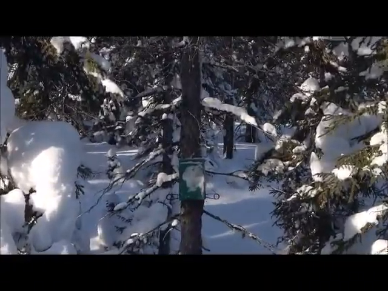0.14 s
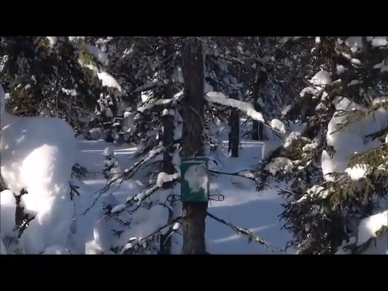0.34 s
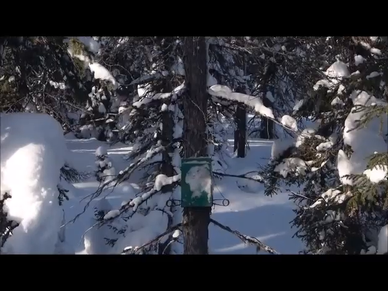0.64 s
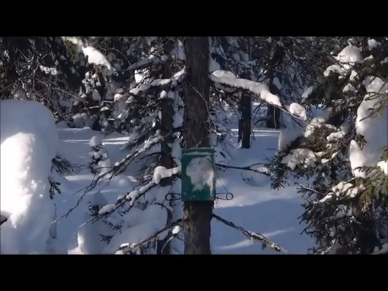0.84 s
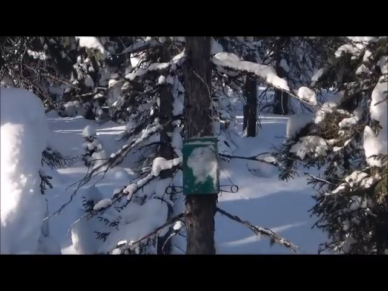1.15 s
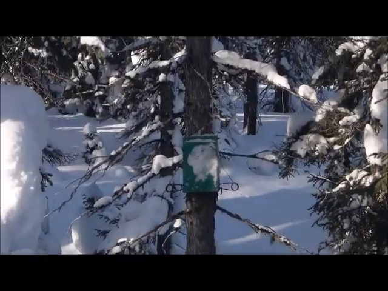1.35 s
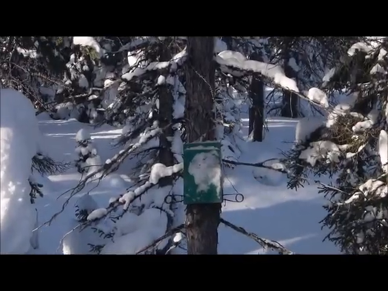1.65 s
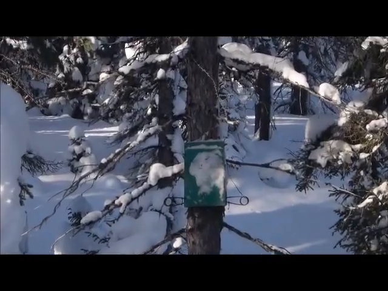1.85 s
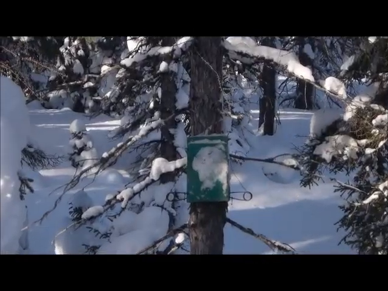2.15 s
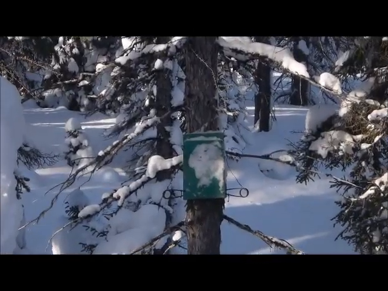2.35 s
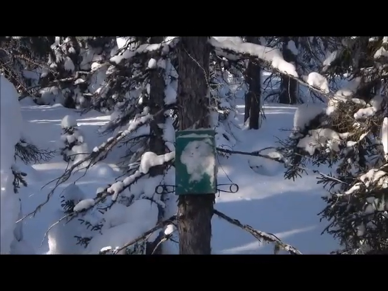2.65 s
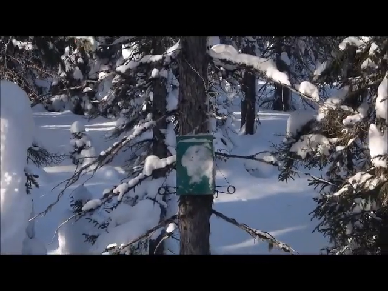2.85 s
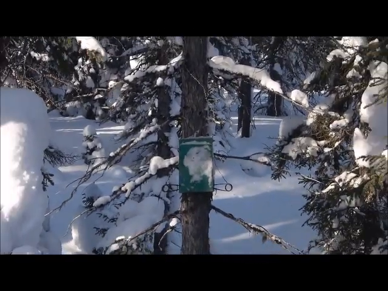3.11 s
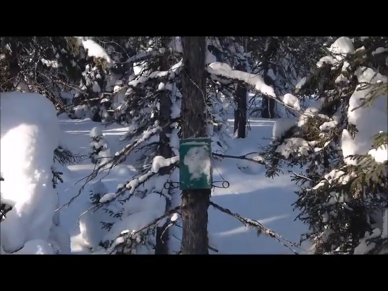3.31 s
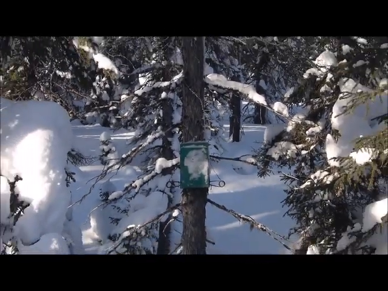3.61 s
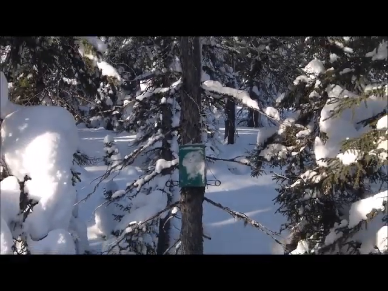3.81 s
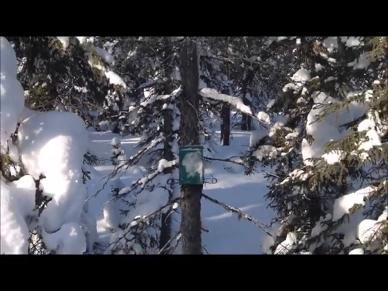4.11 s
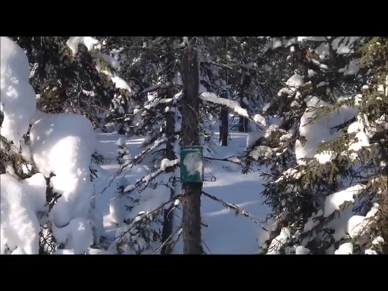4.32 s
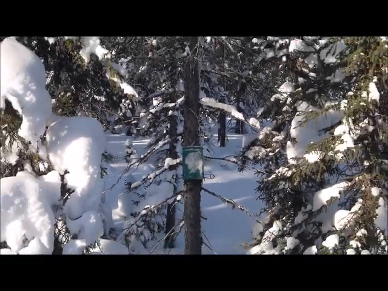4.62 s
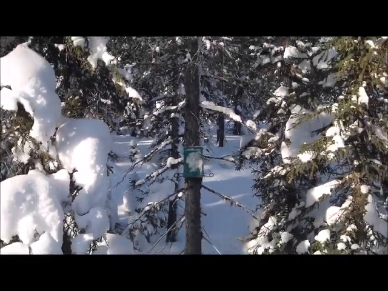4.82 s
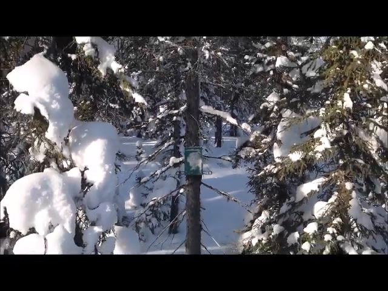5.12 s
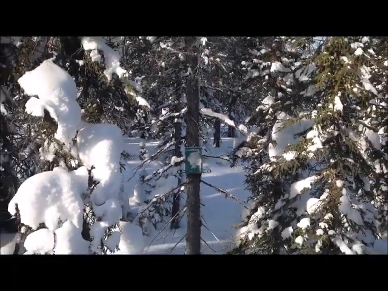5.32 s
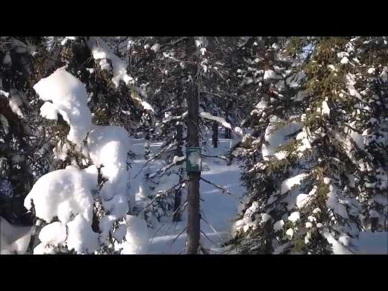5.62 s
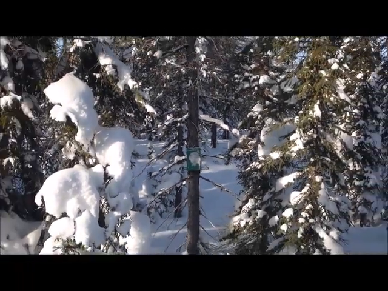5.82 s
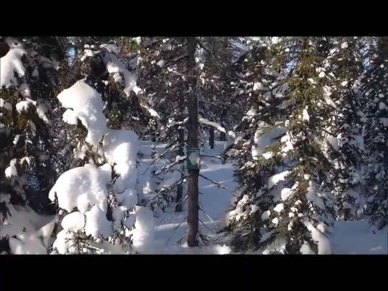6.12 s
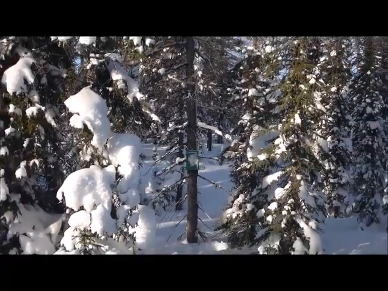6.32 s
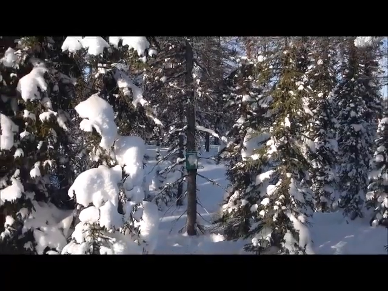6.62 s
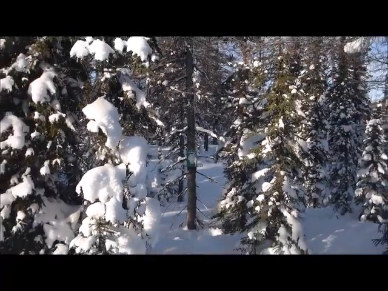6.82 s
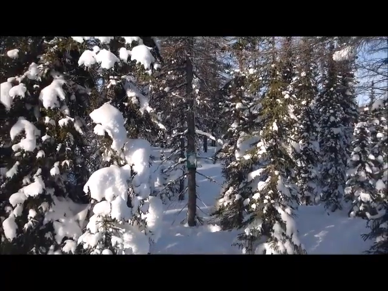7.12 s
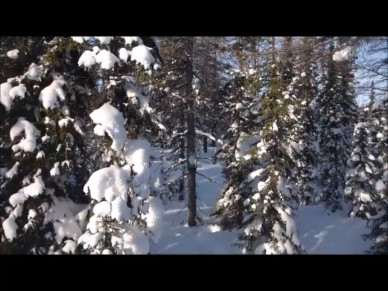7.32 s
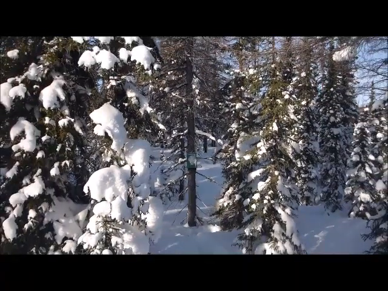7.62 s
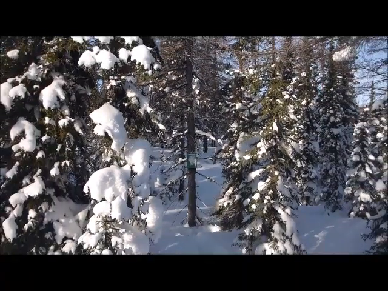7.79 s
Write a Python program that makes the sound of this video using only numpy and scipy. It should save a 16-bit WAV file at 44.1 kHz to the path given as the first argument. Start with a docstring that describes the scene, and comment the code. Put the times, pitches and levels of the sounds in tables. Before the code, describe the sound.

Close outdoor stereo capture of an idling snowmobile: fast, bassy chugging at constant speed with a slight lopsided limp, a droning low hum underneath and gas hiss puffing along. A soft whistle flutters left of centre. A loose panel buzzes briefly twice early on, fingers tick against the camera, and gloves creak faintly. Nothing speeds up or slows down noticeably before the sudden end just after seven seconds.

```python
"""Heavy thumps at about 750 a minute: a snowmobile's two-stroke engine idles near a hand-held camera.
Every turn, a pressure step rings the silencer; a second follows when the charge lights, mostly on alternate turns.
A low hum and rumble lie under them; noise gated by the gas flow hisses and knocks, leaning left.
A wavering tone whistles left of centre; noise taps and grains make ticks and glove creaks on the camera.
The sound is cut off before the end."""
import sys
import numpy as np
from scipy import signal
from scipy.io import wavfile
from scipy.ndimage import uniform_filter1d

SR = 44100
rng = np.random.default_rng(int(sys.argv[2]) if len(sys.argv) > 2 else 0)


def generate_wav(signal):
    """Clip the signal to [-1, 1] and save it as 16-bit WAV at the path in sys.argv[1]."""
    frames = np.transpose(np.atleast_2d(signal))
    scaled = np.clip(frames, -1, 1) * 32767
    pcm = np.round(scaled).astype(np.int16)
    wavfile.write(sys.argv[1], SR, pcm)


N = 350595

HOT_RETURN, COLD_RETURN = .36, .2  # pipe return gain, with and without burnt charge


def silencer():
    """Port steps with a small leak 3 ms ahead; burnt charge adds a slower step."""
    port_s, _, first_db, gap_s, second_db = turns()
    times_s = np.r_[port_s, port_s - .003]
    sizes = undb(np.r_[first_db + 62, first_db + 46])
    cold = thump(times_s, sizes, 0.69, COLD_RETURN)
    hot = thump(port_s + gap_s, undb(second_db + 61), 1.25, HOT_RETURN)
    return cold + hot


# two silencer chambers in series: [centre_hz, width_hz]
CHAMBER_MODES = [(87, 31), (130, 19)]
# silencer shell modes: [centre_hz, width_hz, gain_db]
SHELL_MODES = [(61.2, 8.3, -29), (175, 21, -33), (248.9, 4.5, -24.5), (296, 22, -30.5), (347.7, 20, -41)]
PIPE_MS = 18.7  # round trip


def thump(times_s, sizes, rise_ms, return_gain):
    """Pressure steps ring both chambers and the shell, and a share comes back down the pipe."""
    push = np.diff(puffs(times_s, sizes, rise_ms), prepend=0)
    push = uniform_filter1d(push, size=55)
    out = ring(ring(push, *CHAMBER_MODES[0]), *CHAMBER_MODES[1])
    out = out - sum(undb(db) * ring(push, hz, width_hz) for hz, width_hz, db in SHELL_MODES)
    lag = int(PIPE_MS * SR / 1000)
    echo = out
    for _ in range(3):
        echo = return_gain * np.r_[np.zeros(lag), echo[:-lag]]
        out = out + echo
    return out


# port openings of lit turns, every second turn: [start_s]
FIRING_TIMES = [-0.077, 0.0785, 0.2433, 0.4102, 0.5685, 0.717, 0.868, 1.0223, 1.1836, 1.3418, 1.4983,
                1.6613, 1.8253, 1.9949, 2.1585, 2.3162, 2.4694, 2.6239, 2.7811, 2.9435, 3.104, 3.2628,
                3.4183, 3.5767, 3.7319, 3.8951, 4.0554, 4.2181, 4.3725, 4.5368, 4.699, 4.8606, 5.0225,
                5.1789, 5.3355, 5.4962, 5.6538, 5.8085, 5.9675, 6.1268, 6.2906, 6.4472, 6.6172, 6.7754,
                6.9231, 7.0777, 7.2336]
# turns in between that light partly: [start_s, second_thump_db]
PARTIAL_FIRINGS = [(1.263, -6), (1.908, -13), (2.076, -13.5), (2.235, -7), (3.498, -5.5), (4.295, -2.5),
                   (4.452, -14), (4.781, -4.5), (5.099, -3), (5.255, -5.5), (5.729, -4.5), (5.886, -6.5),
                   (6.046, -3.5), (6.529, -10.5), (6.696, -10.5), (6.848, -17), (7.156, -1.5)]
TURN_MS = 79  # usual length
LIT_SHARE, RELIGHT_SHARE = .491, .008  # lit turn's part of the pair; extra when the next lights too
BURN_SHARE = .1148  # port to second thump, part of the pair
LIT_THUMP_DB, LIT_BURN_DB, UNLIT_BURN_DB = .5, -.65, -25
UNLIT_THUMP_DB, THUMP_DB_PER_MS = 0, .2  # weaker after a quick turn


def turns():
    """Crank turns: port_s, length_s, first_db, gap_s to second thump, second_db."""
    lit_s = np.ravel(FIRING_TIMES)
    pair_s = np.diff(lit_s, append=lit_s[-1] + 2 * TURN_MS / 1000)
    again_db = np.full(len(lit_s), 1. * UNLIT_BURN_DB)
    relight_s, relight_db = np.transpose(PARTIAL_FIRINGS)
    again_db[np.searchsorted(lit_s, relight_s) - 1] = relight_db
    quick_s = pair_s * (LIT_SHARE + RELIGHT_SHARE * undb(again_db))
    gap_s = BURN_SHARE * pair_s
    same = np.ones(len(lit_s))
    between_db = UNLIT_THUMP_DB + THUMP_DB_PER_MS * (1000 * quick_s - TURN_MS)
    fired = [lit_s, quick_s, LIT_THUMP_DB * same, gap_s, LIT_BURN_DB * same]
    between = [lit_s + quick_s, pair_s - quick_s, between_db, gap_s, again_db]
    return np.stack([fired, between], axis=2).reshape(len(fired), -1)[:, 1:-1]


def puffs(times_s, sizes, rise_ms):
    """Pressure u exp(-u), peaking after rise_ms, at each time."""
    x = np.zeros(N)
    index = np.clip((np.asarray(times_s) * SR).astype(int), 0, N - 1)
    np.add.at(x, index, sizes)
    pole = np.exp(-1000 / (rise_ms * SR))
    return signal.lfilter([0, (1 - pole) * pole], [1, -2 * pole, pole ** 2], x)


def port_flow():
    """Gas flow: a burst around each port opening and another around the second thump."""
    port_s, _, _, _, second_db = turns()
    scatter = undb(2 * rng.standard_normal((len(port_s), 2)))
    first = puffs(port_s - .007, scatter[:, 0], 4.34) / 5
    second_sizes = (1 + undb(second_db)) * 0.24 * scatter[:, 1]
    flow = first + puffs(port_s + 0.011, second_sizes, 6.9) / 6.9
    return flow / np.percentile(flow, 97)


# relative hiss spectrum: [centre_hz, density_db_per_hz]
GAS_SPECTRUM = [(120, -30), (200, -1.5), (263, -5), (400, -12), (586, -17), (702, -33), (940, -26),
                (1680, -33), (4420, -48), (6720, -51.5), (8990, -68.5), (11400, -52), (15500, -78)]
# slow change of hiss and casing: [time_s, change_db]
GAS_SWELL = [(0, 1), (.6, 0), (1.2, -0.5), (2, -0.5), (2.7, 0), (3.2, 1), (4, 2), (5, 2), (6, 1.5),
             (7.3, 2)]
# hiss width, before a 0.5 dB cut: [centre_hz, side_minus_mid_db]
GAS_SIDE = [(200, -30), (420, -28), (700, -11), (1300, -7), (2400, -6), (4400, -3), (8000, -3), (15000, -1)]
# hiss balance: [centre_hz, left_minus_right_db]
GAS_LEFT = [(200, 0), (420, 0), (700, 3), (1300, 1), (2400, 2), (4400, 3), (15000, 1.5)]
GAS_DB = -33.5


def gas(flow):
    """Turbulence as third-octave noise bands gated by the flow; wider in the treble."""
    out, swell_db = 0, curve(GAS_SWELL)
    for hz in 200 * 2 ** np.arange(0, 6.4, 1 / 3):
        mid, side = (band(rng.standard_normal(N), hz, hz / 3) for _ in range(2))
        gate = 1 + 0.93 * min(hz / 700, 1) * flow
        side = undb(over(GAS_SIDE, hz) - 0.5) * side
        both = pan(mid, over(GAS_LEFT, hz)) + opposed(side)
        band_db = over(GAS_SPECTRUM, hz) + 1.5 * walk(13) + min(hz / 1500, 1) * swell_db
        out = out + undb(band_db) * gate * both
    return level(out, GAS_DB)


# engine casing modes: [centre_hz, width_hz, level_db]
CASING_MODES = [(1464, 170, -60.5), (1646, 260, -62), (2060, 190, -68), (4920, 170, -76), (6870, 810, -78),
                (11090, 600, -83.5)]
# loose panel buzzes: [start_s, end_s, level_db]
PANEL_BUZZES = [(1.32, 1.54, -46.5), (2.15, 2.62, -45)]
# panel modes, relative: [centre_hz, width_hz, level_db]
PANEL_MODES = [(540, 200, 0), (720, 160, 1), (1130, 200, -1), (1700, 450, -3), (2300, 600, -10)]


def knocks(flow):
    """Flow-gated noise shakes the casing modes every turn, and a loose panel now and then."""
    shake = flow * rng.standard_normal(N)
    casing = modes(shake, CASING_MODES)
    shake = (0.64 + flow) * rng.standard_normal(N)
    panel = level(modes(shake, PANEL_MODES), 0)
    loose = sum(undb(db) * span(start_s, end_s, .015) for start_s, end_s, db in PANEL_BUZZES)
    return pan(casing * undb(curve(GAS_SWELL)), 3) + pan(panel * loose, 0.7)


WHISTLE_HZ, WHISTLE_HZ_PER_DB, WHISTLE_MID_DB = 942, 1.5, -45  # pitch at mid level, slope
WHISTLE_LEFT_DB, FLUTTER_DB = 4.6, 2.5


def whistle():
    """Narrow tone on the gas flow, rising in pitch as it swells, with a noise-band edge."""
    db = blowing() + FLUTTER_DB * walk(30)
    pitch_hz = WHISTLE_HZ + WHISTLE_HZ_PER_DB * (db - WHISTLE_MID_DB) + 12 * walk(45)
    tone = np.sqrt(2) * np.sin(2 * np.pi * np.cumsum(pitch_hz) / SR) * undb(2 * walk(50))
    edge = level(band(rng.standard_normal(N), WHISTLE_HZ, 60), -3.5)
    return pan((tone + edge) * undb(db), WHISTLE_LEFT_DB)


# slow whistle strength, before turn-by-turn changes: [time_s, level_db]
WHISTLE_STRENGTH = [(0, -47), (.35, -46), (.45, -44), (.7, -48.5), (1.05, -42.5), (1.45, -42), (1.6, -45.5),
                    (2.05, -45.5), (2.4, -41), (2.85, -45.5), (3.3, -42.5), (6.4, -42.5), (6.55, -48.5),
                    (6.65, -40.5), (7.3, -42)]
WHISTLE_DB_PER_MS = -.75  # weaker while the engine turns slowly
SAG_LIT_DB, SAG_UNLIT_DB = -6, -12  # late in a turn


def blowing():
    """Whistle dB: up at the port, sagging late in the turn, most when unlit; weaker when slow."""
    _, _, _, gap_s, second_db = turns()
    sag_db = SAG_UNLIT_DB + (SAG_LIT_DB - SAG_UNLIT_DB) * undb(second_db)
    mean_turn_ms = 1000 * gap_s / BURN_SHARE / 2  # over the pair
    speed_db = WHISTLE_DB_PER_MS * (mean_turn_ms - TURN_MS)
    return curve(WHISTLE_STRENGTH) + turn_curve(np.c_[speed_db, speed_db, speed_db + sag_db])


SAG_FROM, SAG_DEEPEST = .4, .78  # parts of the turn


def turn_curve(values):
    """Interpolate three values a turn: port opening, sag start, deepest sag."""
    port_s, length_s, _, _, _ = turns()
    knots_s = np.c_[port_s, port_s + SAG_FROM * length_s, port_s + SAG_DEEPEST * length_s]
    return curve(np.c_[knots_s.ravel(), values.ravel()])


HUM_HZ, HUM_DB = 251, -32.5
HUM_LATE_DB = 4  # swell late in an unlit turn, before levelling
RUMBLE_DB = -32


def hum():
    """Wavering low tone, swelling late in unlit turns, over chassis rumble from low noise bands."""
    pitch_hz = HUM_HZ + 3 * walk(11)
    tone = np.sin(2 * np.pi * np.cumsum(pitch_hz) / SR) * undb(1.8 * walk(8) + HUM_LATE_DB * late())
    rumble = band(rng.standard_normal(N), 120, 110)
    apart = band(rng.standard_normal(N), 110, 90)  # opposed left and right
    return level(tone, HUM_DB) + level(rumble, RUMBLE_DB) + opposed(level(apart, -48.5))


def late():
    """0 at the port, rising late in the turn to how far the charge stayed unlit (0-1)."""
    second_db = turns()[4]
    return turn_curve(np.outer(1 - undb(second_db), [0, 0, 1]))


# camera taps, mode levels against the third mode:
# [start_s, level_db, left_minus_right_db, mode1_db, mode2_db, mode4_db]
CAMERA_TICKS = [(1.3056, -50, 5.5, 2, 10, -22), (1.399, -48.5, 8.5, -4, 7.5, -26),
                (1.4311, -21.5, -4.5, -5.5, -5, -23.5), (2.3997, -41.5, 5.5, 2, -12, -24),
                (2.463, -31.5, 3, 6, -11.5, -22.5), (2.49, -40.5, 0.5, -2, -4, -13.5),
                (4.3185, -43, -8, -13, -22, 3), (4.3214, -30.5, 4, 2, -2, -2.5)]
# camera body modes: [centre_hz, width_hz]
BODY_MODES = [(3600, 860), (5000, 1160), (6800, 630), (12500, 2200)]


def ticks():
    """Short decaying noise taps ring the modes of the camera body."""
    out = np.zeros((2, N))
    for start_s, db, left_db, low_db, mid_db, top_db in CAMERA_TICKS:
        tap = rng.standard_normal(1300) * np.exp(-np.arange(1300) / 18)
        rings = [band(tap, hz, width_hz) for hz, width_hz in BODY_MODES]
        gains_db = (low_db, mid_db, 0, top_db)
        sound = sum(undb(g) * r / np.abs(r).max() for g, r in zip(gains_db, rings))
        i = int(start_s * SR)
        out[:, i:i + 1300] += pan(undb(db - 3.0) * sound, left_db)
    return out


# gloves on the camera: [start_s, end_s, start_level_db, centre_hz, width_hz]
GLOVE_CREAKS = [(0.95, 1.014, -54, 6340, 2500), (1.365, 1.486, -57, 6600, 1200),
                (1.488, 1.537, -57.5, 6740, 1200), (2.275, 2.354, -58.5, 6560, 1536),
                (2.456, 2.562, -65.5, 6860, 1000), (6.319, 6.387, -54, 3460, 2520),
                (6.32, 6.388, -51, 6500, 2510), (6.318, 6.41, -59, 11200, 2210)]


def creaks():
    """Cloth slipping on the camera: dense uneven noise grains in a band, falling 9 dB."""
    out = np.zeros((2, N))
    for start_s, end_s, db, hz, width_hz in GLOVE_CREAKS:
        grains = rng.standard_normal((2, N)) * undb(2 * walk(60))
        pair = grains[0] + opposed(0.43 * grains[1])
        gain = span(start_s, end_s, 0.0072) * undb(-9 * fade(start_s, end_s))
        out += gain * level(band(pair, hz, width_hz), db)
    return out


def undb(db):
    """dB to amplitude ratio."""
    return 10 ** (np.asarray(db) / 20)


def level(x, db):
    """Scale to an RMS level in dB."""
    return x * undb(db) / np.sqrt(np.mean(x ** 2))


def ring(x, hz, width_hz):
    """Resonance with gain 1 at the centre."""
    return signal.lfilter(*signal.iirpeak(hz, hz / width_hz, fs=SR), x)


def band(x, hz, width_hz):
    """The same resonance twice, for steeper sides."""
    return ring(ring(x, hz, width_hz), hz, width_hz)


def modes(x, table):
    """Sum of bands, each set to its own RMS level."""
    return sum(level(band(x, hz, width_hz), db) for hz, width_hz, db in table)


def curve(table):
    """Interpolate a table over time."""
    time_s, value = np.transpose(table)
    return np.interp(np.arange(N) / SR, time_s, value)


def over(table, hz):
    """Interpolate a table over log frequency."""
    table_hz, value = np.transpose(table)
    return np.interp(np.log(hz), np.log(table_hz), value)


def pan(x, left_db):
    """Stereo pair with a left minus right level difference."""
    return x * undb(np.array([[left_db / 2], [-left_db / 2]]))


def opposed(x):
    """Stereo pair of opposite polarity."""
    return x * np.array([[1], [-1]])


def walk(rate_hz):
    """Random levels held 1 / rate_hz and slewed twice; spread near 1."""
    k = int(SR / rate_hz)
    held = np.repeat(rng.standard_normal(N // k + 1), k)
    return 1.302 * uniform_filter1d(uniform_filter1d(held, k), k)[:N]


def fade(start_s, end_s):
    """Linear ramp 0 to 1."""
    return np.clip((np.arange(N) / SR - start_s) / (end_s - start_s), 0, 1)


def span(start_s, end_s, edge_s):
    """Gate with linear edges."""
    t = np.arange(N) / SR
    return np.clip(np.minimum(t - start_s, end_s - t) / edge_s, 0, 1)


def scene():
    """Engine layers share one gas flow; camera handling is added."""
    flow = port_flow()
    return silencer() + hum() + gas(flow) + knocks(flow) + whistle() + ticks() + creaks()


# microphone dips: [centre_hz, width_hz, share_removed]
MIC_DIPS = [(2850, 69, 0.33), (9030, 1800, 1)]
END_S, TOP_HZ = 7.2835, 15700


def record(dry):
    """Microphone: bass cut below 42 Hz, two dips, abrupt end, top removed."""
    x = signal.sosfilt(signal.butter(2, 42, "high", fs=SR, output="sos"), dry)
    for hz, width_hz, share in MIC_DIPS:
        x = x - share * ring(x, hz, width_hz)
    x = x * (np.arange(N) < END_S * SR)
    return signal.sosfilt(signal.ellip(8, .2, 70, TOP_HZ, fs=SR, output="sos"), x)


dry = scene()
out = record(dry)
generate_wav(out)
```